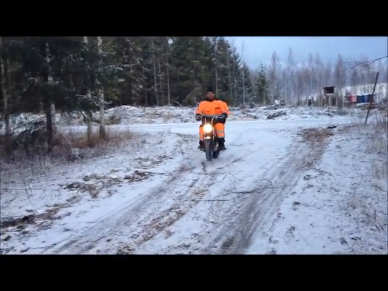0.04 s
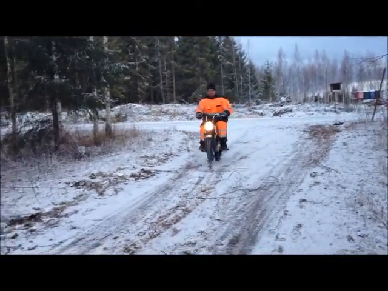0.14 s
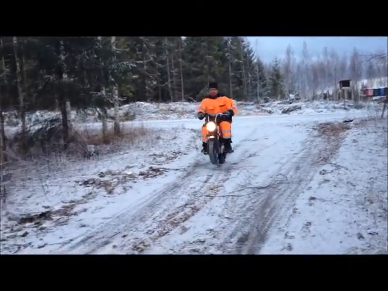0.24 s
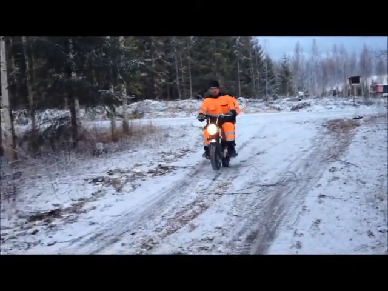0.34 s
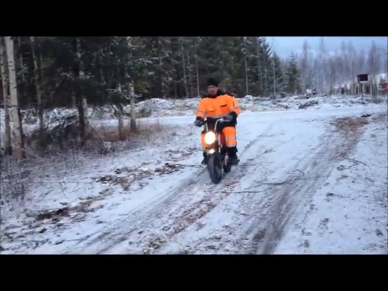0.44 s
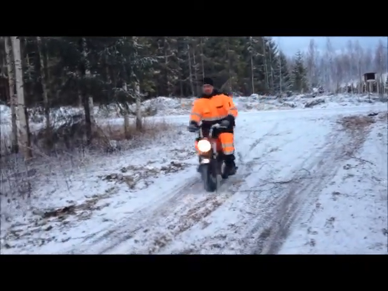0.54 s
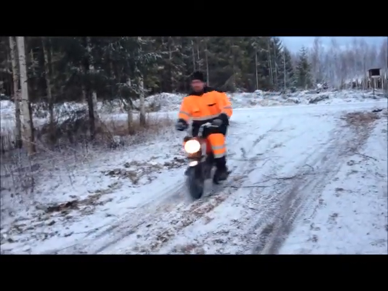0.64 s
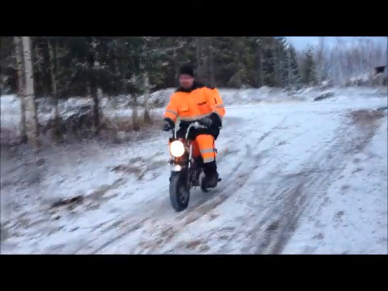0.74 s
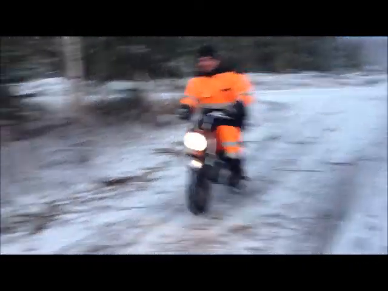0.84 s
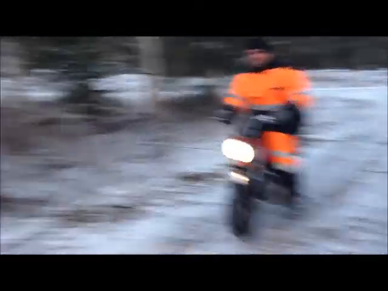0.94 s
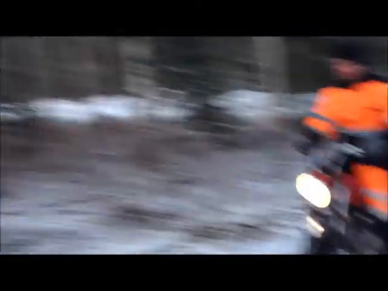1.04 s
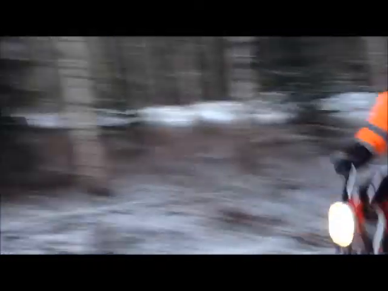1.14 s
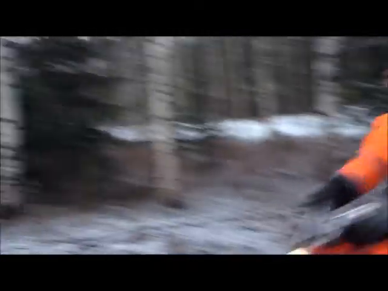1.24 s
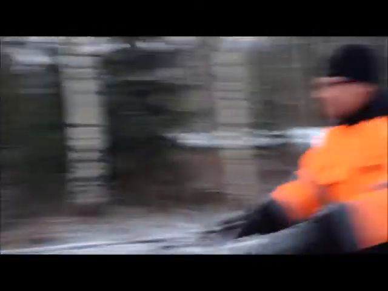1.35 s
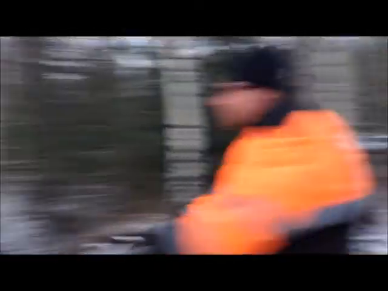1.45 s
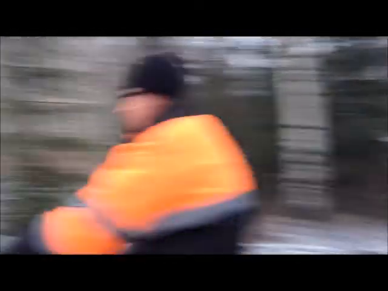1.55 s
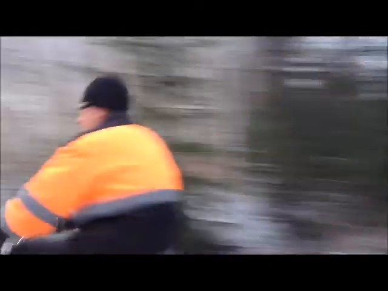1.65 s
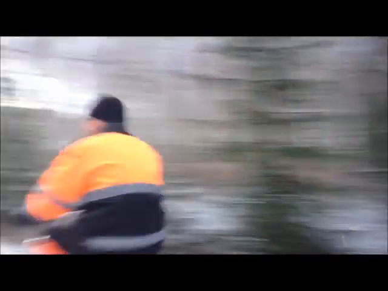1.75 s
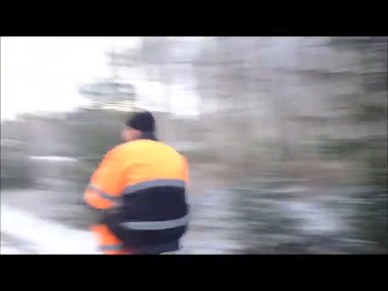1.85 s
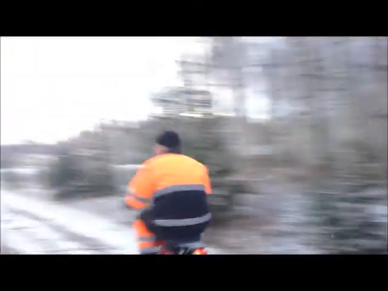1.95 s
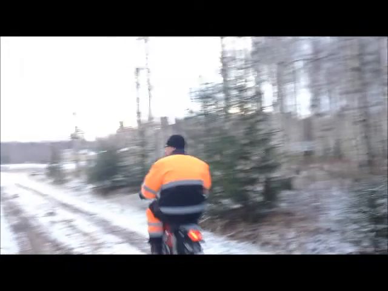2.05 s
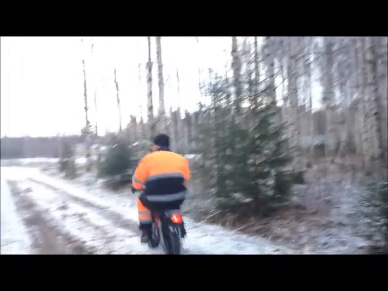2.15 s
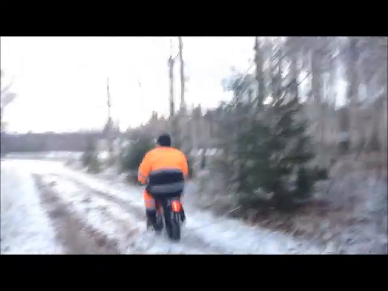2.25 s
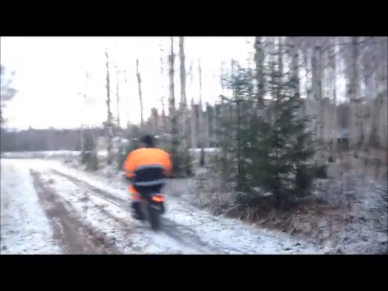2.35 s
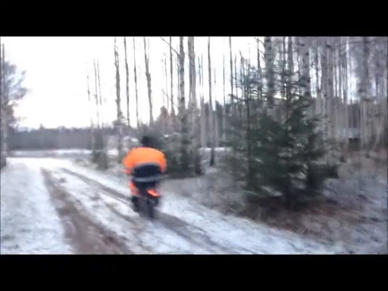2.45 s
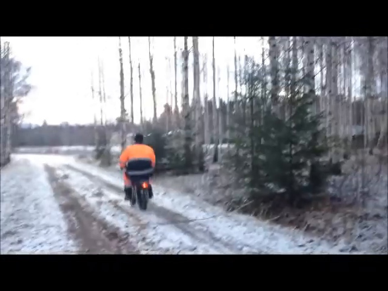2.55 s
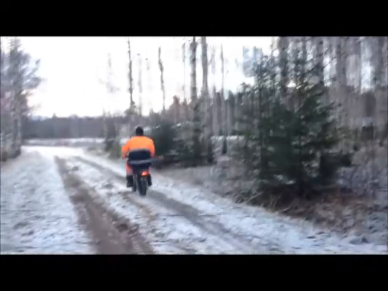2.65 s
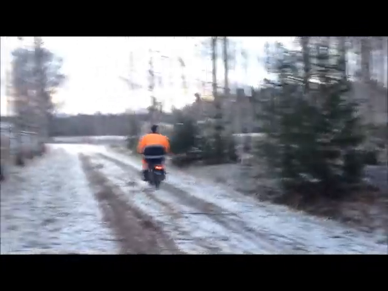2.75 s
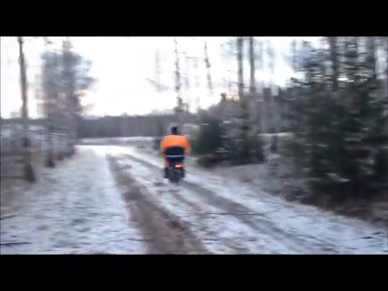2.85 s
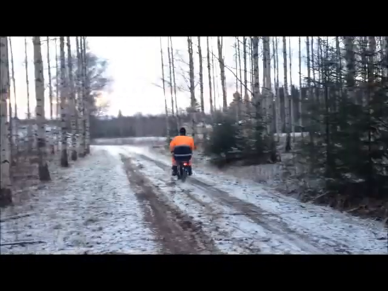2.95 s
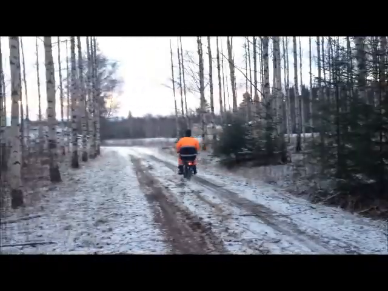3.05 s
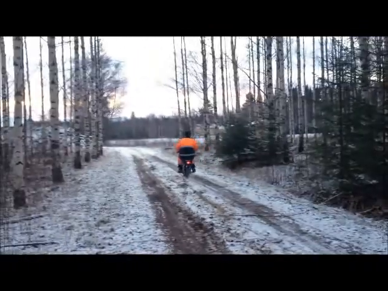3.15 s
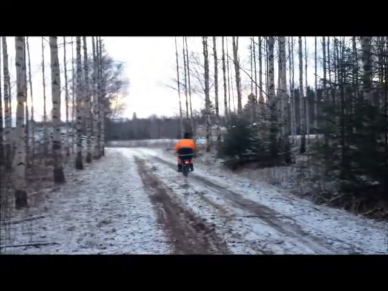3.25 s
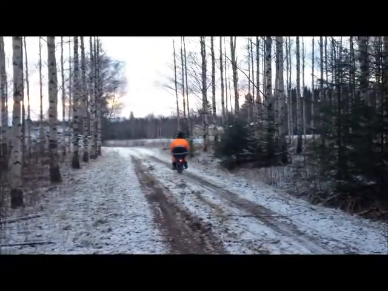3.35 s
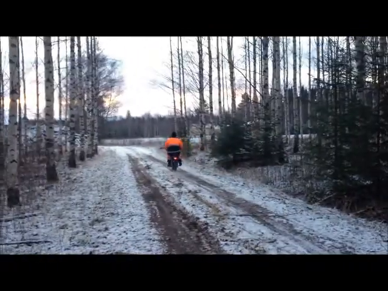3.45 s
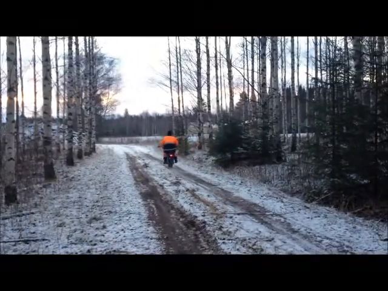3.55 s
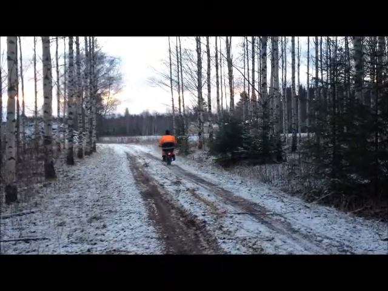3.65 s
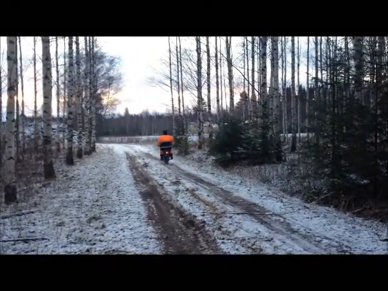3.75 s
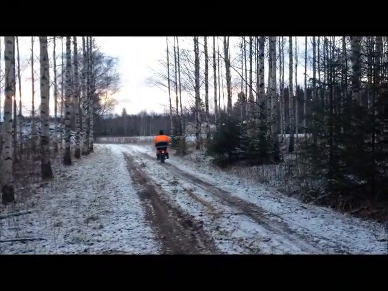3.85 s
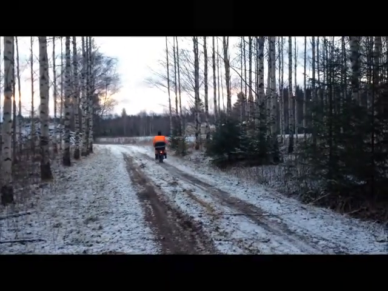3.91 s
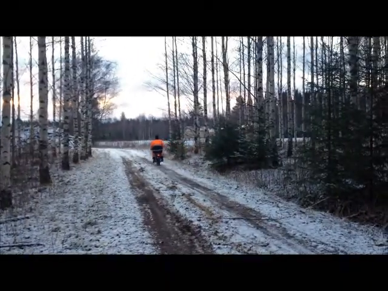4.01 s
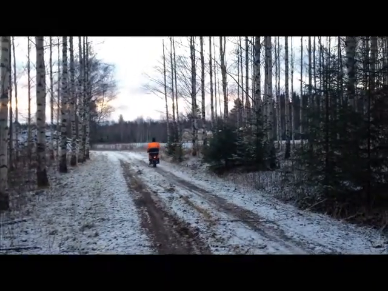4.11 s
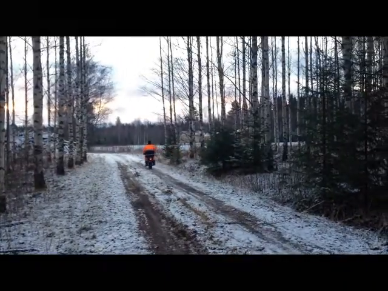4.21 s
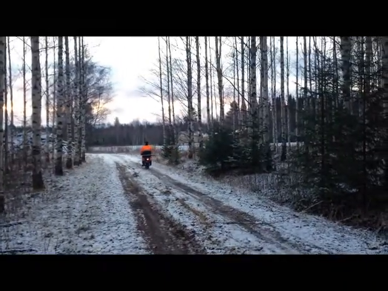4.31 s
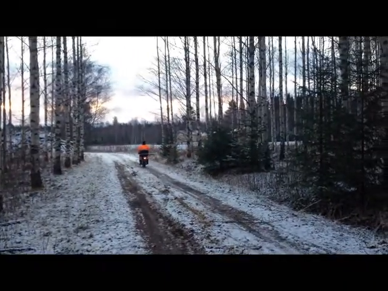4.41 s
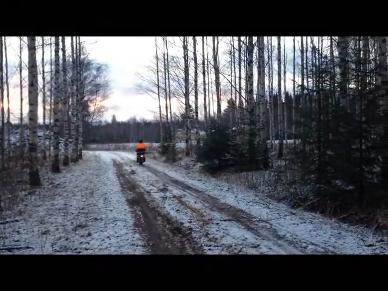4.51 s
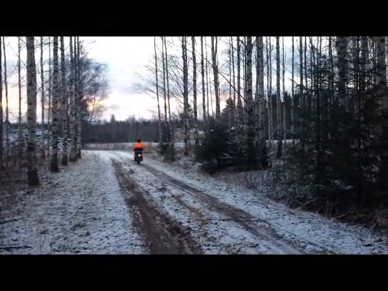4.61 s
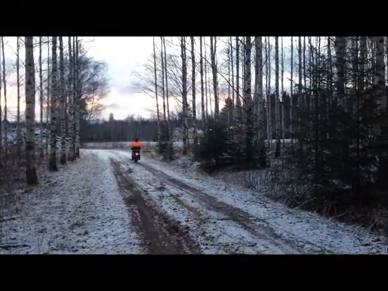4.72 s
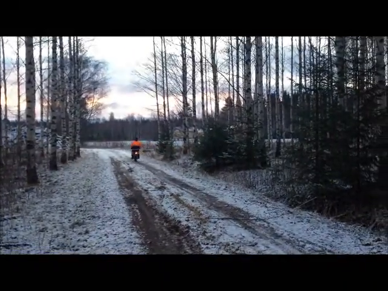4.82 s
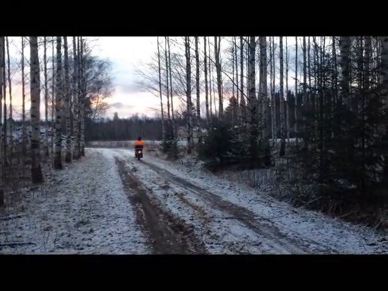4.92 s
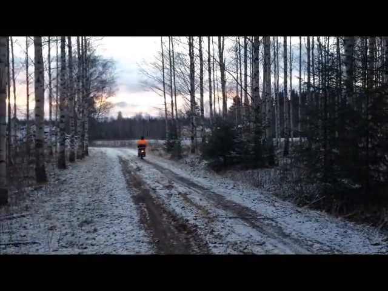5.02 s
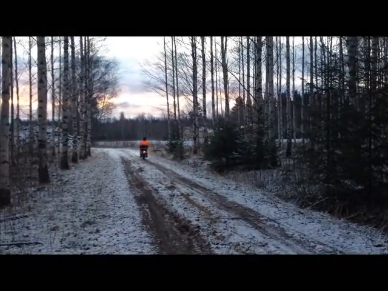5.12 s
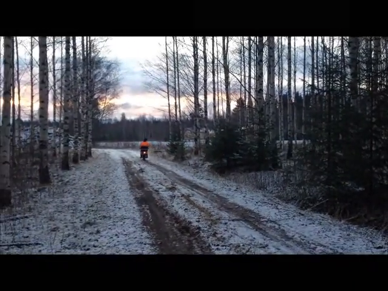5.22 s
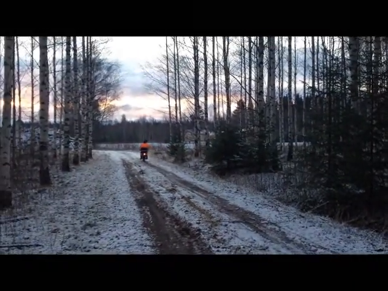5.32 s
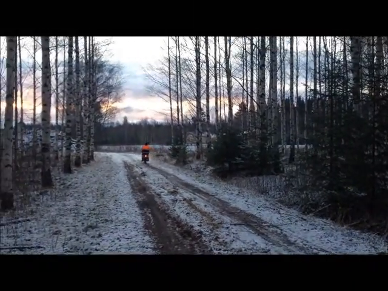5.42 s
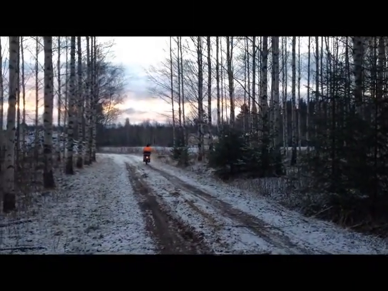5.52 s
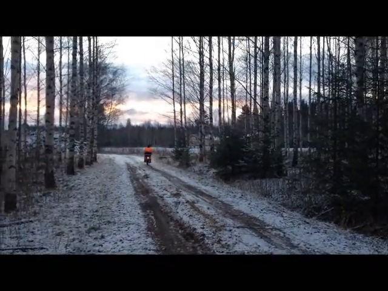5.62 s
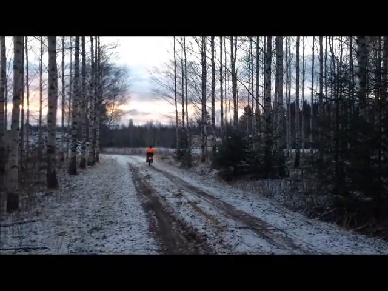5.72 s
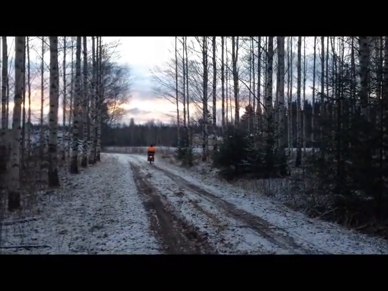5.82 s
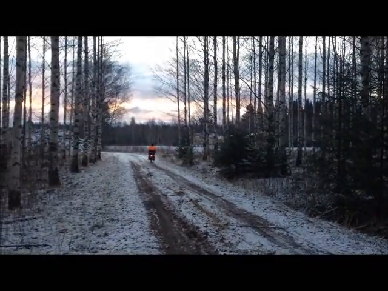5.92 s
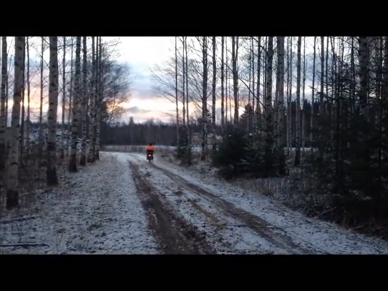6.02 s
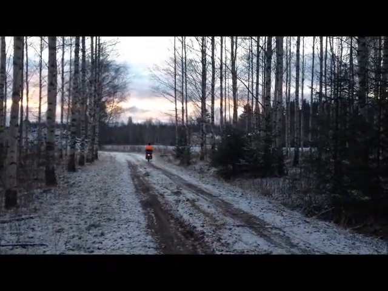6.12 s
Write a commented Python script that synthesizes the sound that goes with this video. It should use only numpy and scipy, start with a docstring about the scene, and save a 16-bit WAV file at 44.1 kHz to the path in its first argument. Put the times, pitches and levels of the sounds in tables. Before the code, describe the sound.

Outdoors among trees, one little motorbike comes towards a thin-sounding handheld microphone. Its tight engine buzz, chain hiss and tyre noise grow abruptly, peaking in a bright close pass. A quick gear change lowers the note, then it climbs slightly while receding. Finally the rider lets off: loose, uneven puttering, a thin descending whine and a small dull pop, almost sinking into quiet.

```python
"""A single-cylinder motorbike comes up a snowy forest track, passes close, shifts up and pulls away,
then shuts the throttle and coasts down with gear whine and one soft backfire.
Under load the firing tones are sums of orders; blasts and pulsed turbulence ring exhaust, shell and fins.
Coloured noise makes the mechanical hiss and, beneath it, the tyre rumble and forest murmur.
The snow returns a delayed share of the sound."""
import sys
import numpy as np
from scipy import signal
from scipy.io import wavfile
from scipy.ndimage import uniform_filter1d

SR = 44100
rng = np.random.default_rng(int(sys.argv[2]) if len(sys.argv) > 2 else 0)


def output_pcm(signal):
    """Save a mono or channel-first signal as 16-bit PCM at the path in sys.argv[1].

    Samples are clipped to [-1, 1] before scaling.
    """
    pcm = np.clip(np.atleast_2d(signal).T, -1, 1) * 32767
    wavfile.write(sys.argv[1], SR, np.round(pcm).astype(np.int16))


N = 272097
T = np.arange(N) / SR  # s
PASS_S, SPEED_M_S, NEAREST_M = 1.597, 7.1, 1.865
ENGINE_M, PIPE_M, EAR_M = 0.387, 0.43, 1.544  # heights above the snow
SHUT_S, SHUT_LENGTH_S = 3.8, 0.045  # throttle fully shut; time it takes to shut


def scene():
    """Bike and backfire as one channel."""
    return (engine() + pops())[None]


def engine():
    """Clean low orders under load; blasts and turbulence ring the shell and fins, and the exhaust when coasting."""
    # Each row: time in s, firing rate in firings per s.
    rev_curve = [(0, 74.6), (.09, 71.3), (.2, 65.8), (.27, 64.9), (.54, 63), (.64, 63.3), (.74, 68.1),
                 (.82, 71.1), (1.16, 72.9), (1.59, 76.2), (1.78, 77.4), (1.9, 80.6), (2.0, 71.2),
                 (2.09, 63.3), (2.16, 59.1), (2.27, 58.8), (2.43, 61.1), (2.64, 62.5), (3.06, 63.9),
                 (3.59, 67.1), (3.73, 67.6), (3.86, 64.1), (4.01, 62.4), (4.35, 61.4), (4.7, 58.4),
                 (5.03, 51.7), (5.3, 48.2), (5.59, 44.8), (6.17, 37.9)]
    # Each row: time in s, levels in dB of silencer shell, cylinder fins and mechanical hiss.
    ride_levels = [(0, -38, -30, -28), (.1, -37, -31.5, -27.5), (.3, -37.5, -28, -29.5),
                   (.69, -41, -24.5, -27), (.91, -33.5, -20, -21.5), (1.06, -33.5, -21, -21.5),
                   (1.29, -25.5, -25, -20), (1.5, -24, -20.5, -20.5), (1.72, -27, -21.5, -20.5),
                   (1.82, -27.5, -25, -20.5), (2.03, -27.5, -29.5, -23), (2.3, -44, -32, -29),
                   (2.52, -40.5, -35.5, -30.5), (3.27, -41, -42, -33.5), (3.74, -33.5, -41.5, -34),
                   (3.82, -51, -53, -38), (4.5, -55.5, -61, -44), (5.79, -83.5, -62, -50),
                   (6.17, -80, -69, -53)]
    # Modes of each part. Each row: frequency in Hz, width in Hz (doubled on the second pass), gain in dB.
    exhaust_modes = [(120, 44, -11), (179, 96, 5), (260, 83, -1), (331, 89, -5.5), (475, 275, -11.5)]
    shell_modes = [(672, 100, 8), (756, 108, 7), (852, 360, -2.5)]
    fin_modes = [(1138, 280, 5.5), (1427, 156, 19.5), (1482, 490, 1.5), (2125, 360, 2.5), (2930, 780, -3.5)]
    # Modes left in the fins without combustion, same columns.
    idle_fin_modes = [(1300, 180, 1), (1480, 180, -3.5)]
    pump_db, pump_fade_db_s, pump_far_db = -31, -9.5, -54  # at shut-off, slope, floor
    flutter_db = -3.5

    rate = uniform_filter1d(curves(rev_curve)[0], size=1200)  # the flywheel smooths the speed
    turns = np.cumsum(rate) / SR  # firing cycles so far
    shell_db, fins_db, hiss_db = curves(ride_levels)
    loaded, rough = throttle(), turbulence_share()
    fired = strength(turns)

    # throttle shut, the piston only pumps air
    pumping = np.hypot(amp(pump_db + pump_fade_db_s * (T - SHUT_S)), amp(pump_far_db))
    # the fins' ring flutters as the bike passes close
    flutter = evened(smoothed_twice(rng.standard_normal(N), 1300))

    pipe = rung(turns, fired, rough, exhaust_modes, part=0)
    shell = rung(turns, fired, rough, shell_modes, part=1)
    fins = rung(turns, fired, rough, fin_modes, part=2)
    idle = rung(turns, fired, rough, idle_fin_modes, part=2)

    pipe = (1 - loaded) * pumping * levelled(pipe)
    shell = amp(shell_db) * levelled(ground(shell))
    fins = levelled(ground(loaded * fins + (1 - loaded) * idle))
    fins = amp(fins_db + flutter_db * closeness() * flutter) * fins
    pull = loaded * fired * tones(turns, rate, rough)
    return pull + pipe + shell + fins + hiss(turns, hiss_db) + whine(turns, fins_db) + rumble(hiss_db)


def tones(turns, rate, rough):
    """Orders 1 to 10 of a blast running to and fro in the pipe and bouncing off snow; each has a little noise."""
    # Level before colour and bounce. Each row: time in s, level in dB.
    pull_levels = [(0.0, -37.5), (0.3, -39), (0.65, -36), (0.85, -31.5), (1.1, -27), (1.3, -24.5),
                   (1.5, -25.5), (1.74, -23.5), (1.82, -27.5), (1.95, -27), (2.1, -34.5), (2.3, -35.5),
                   (3.0, -41.5), (3.74, -42.5)]
    # Colour by bearing. Each row: frequency in Hz, gains in dB from the front, the side and behind.
    pipe_colour = [(120.0, 0.8, -13.5, 2), (163, -3.5, 4, 6), (190.0, 9.5, 1, 7.5), (248, 9.5, 7, 3),
                   (301, 12.5, 2, 4.8), (349, -11.5, -7, -1), (389.4, 13, 19, 7.5), (442.2, 19.5, 18.5, 10),
                   (485, 13, 7.7, 1.2), (550.0, 1.5, -5, -11.5), (670, -15, -39, 8.5), (714, -2, -28, -29),
                   (800.0, -32, -9, -31)]
    # Order 1 against the colour of order 2: dB from the front, the side and behind.
    first_order_db = (-31.5, -25, -26)
    step = 64  # samples between updates of slow controls
    turn_power = 1.32  # how sharply the colour turns with the bearing
    snow_share = 0.89  # of the tones
    trip_s, trip_return = .0046, .8  # round trip in the pipe; share that comes back
    box_hz, box_width_hz = 419, 42  # from the front, the air box rings late
    lead_cycles = 0.3636  # the low tones lead the metal ring

    t, rate, rough = T[::step], rate[::step], rough[::step]
    _, extra_s, bearing = path(PIPE_M, t)
    front = np.clip(bearing, 0, 1) ** turn_power
    rear = np.clip(-bearing, 0, 1) ** turn_power
    hz, *colours = np.transpose(pipe_colour)
    level_db = curves(pull_levels)[0][::step]
    spin, order = np.exp(2j * np.pi * turns), 1
    out = 0
    for k in range(1, 11):
        ahead, beside, behind = (read(np.c_[hz, colour], max(k, 2) * rate) + first_db * (k == 1)
                                 for colour, first_db in zip(colours, first_order_db))
        db = level_db + front * ahead + (1 - front - rear) * beside + rear * behind
        fuzz = 1 + 0.5 * rough * complex_waver(len(t), 8)
        trip_phase = np.exp(-2j * np.pi * k * rate * trip_s)
        echoes = 1 / (1 - (1 - front) * trip_return * trip_phase)
        echo_phase = echoes / abs(echoes)  # the pipe echoes set phase only
        bounce = abs(1 + snow_share * np.exp(-2j * np.pi * k * rate * extra_s))
        late = 2 * front * np.arctan((k * rate - box_hz) / box_width_hz)
        late = late - 2 * np.pi * k * lead_cycles
        gain = np.sqrt(2) * amp(db) * fuzz * np.exp(-1j * late) * bounce * echo_phase
        order = order * spin
        out = out + (np.interp(T, t, gain) * order).real
    return out


def rung(turns, fired, rough, modes, part):
    """Blasts and noise puffs ring one part of the bike, smeared by scatter off nearby trunks."""
    # Factor on the turbulence share for exhaust, shell, fins.
    turbulence_factors = [1.6, 2.3, 1.9]
    # Trunk echo level in dB for exhaust, shell, fins.
    trunk_echo_db = (-9, -6, -9)
    u = np.linspace(0, 1, num=4097)
    harmonics = np.arange(2, 50)[:, None]
    click = np.cos(2 * np.pi * harmonics * u).sum(0)  # one cycle of a band-limited pulse
    # the exhaust valve opens, and the intake valve follows part of a cycle later
    exhaust = np.interp(turns % 1, u, click)
    intake = np.interp((turns - .42) % 1, u, click)
    blasts = evened(exhaust + 0.43 * intake)
    puffs = evened((1.4 + np.exp(-(turns % 1) / .5)) * rng.standard_normal(N))
    share = np.clip(turbulence_factors[part] * rough, 0, .95)
    direct = body(fired * (np.sqrt(1 - share ** 2) * blasts + share * puffs), modes)

    t = np.arange(3000) / SR
    signs = rng.choice([-1., 1.], len(t))
    taps = signs * (rng.random(len(t)) < .03) * amp(-60 * t / 0.15)  # sparse, -60 dB per 0.15 s
    scatter = signal.oaconvolve(direct, taps / np.linalg.norm(taps))[:N]
    return direct + amp(trunk_echo_db[part]) * scatter


def strength(turns):
    """Uneven burning: a gain drawn anew for every firing."""
    draws = rng.standard_normal(int(turns[-1]) + 2)[np.round(turns).astype(int)]
    spread_db = unevenness(even=.4, strained=.7, pumping=2.2, dying=3.0)
    return amp(spread_db * uniform_filter1d(draws, 200))


def turbulence_share():
    """Share of turbulence in the drive, 0-1, ahead of each part's own factor."""
    return unevenness(even=.1, strained=.15, pumping=.48, dying=.45)


def unevenness(even, strained, pumping, dying):
    """From even to strained with closeness under load; from pumping to dying over the coast-down."""
    slowed = np.clip((T - SHUT_S) / (T[-1] - SHUT_S), 0, 1)
    pulling = even + (strained - even) * closeness()
    return throttle() * pulling + (1 - throttle()) * (pumping + (dying - pumping) * slowed)


def throttle():
    """1 while the engine pulls, 0 once it coasts."""
    return np.clip((SHUT_S - T) / SHUT_LENGTH_S, 0, 1)


def path(height_m, t):
    """Distance along the snow in m, extra delay of its bounce in s, bearing (towards 1 ahead, -1 behind)."""
    along = SPEED_M_S * (PASS_S - t)
    flat = np.hypot(NEAREST_M, along)
    extra_m = np.hypot(flat, EAR_M + height_m) - np.hypot(flat, EAR_M - height_m)
    return flat, extra_m / 343, along / np.hypot(flat, EAR_M)


def closeness():
    """1 as the bike passes, falling towards 0 far off."""
    return 1 - abs(path(ENGINE_M, T)[2])


def ground(x):
    """The snow path is longer the nearer the bike: a comb that sweeps down and back up."""
    flat, extra_s, _ = path(ENGINE_M, T)
    soft = resonate(x, 0, 5000) / 2  # snow swallows treble
    share = 0.22 * np.clip(18.0 / flat, 0, 1)  # far off, scatter from the trees fills the comb
    return x + share * np.interp(T - extra_s, T, soft)


def hiss(turns, db):
    """Valve gear, chain and tyres: patchy noise beating once and twice a cycle; its colour turns with the bike."""
    # Noise colour ahead, near and far. Each row: frequency in Hz, spectral level in dB.
    ahead_colour = [(1000, -11), (1700, 0), (2120, -8.5), (2410, -5.5), (3440, 0), (4700, -12),
                    (5550, -13.5), (6910, -9), (11100, -22), (13300, -28), (15200, -26)]
    near_colour = [(1000, -14.5), (1700, 4), (2010, -16), (2260, -5), (2640, -13), (3260, -4.5),
                   (3990, -1.5), (4750, -16), (6420, -5), (8150, -10), (9710, -20.5), (12200, -18),
                   (15200, -24.5)]
    far_colour = [(1000, -8.5), (1700, -9.5), (2410, -6), (2970, -11), (3260, 0.5), (3540, -5), (3950, 2.5),
                  (4250, -5), (4750, -21.5), (5970, -6.5), (6790, -13.5), (10800, -21), (15200, -39)]
    patch_db, flicker_db = 3.2, 1.0
    band_db = 2.2  # broad bands above 4 kHz that swell and fade over a second or so

    def shape_db(hz, s):
        ahead = np.clip((1.2 - s) / 0.25, 0, 1)
        far = np.clip((s - 2.) / 1.83, 0, 1)
        patches = rng.standard_normal((len(s), len(hz))).T
        patches = uniform_filter1d(patches, 2, axis=0)
        patches = evened(uniform_filter1d(patches, 90, axis=1))
        bands = rng.standard_normal((len(s), len(hz))).T
        bands = uniform_filter1d(uniform_filter1d(bands, 6, axis=0), 4, axis=0)
        bands = evened(uniform_filter1d(bands, 350, axis=1))
        flicker = evened(uniform_filter1d(rng.standard_normal(len(s)), 12))
        colour = ahead * read(ahead_colour, hz) + far * read(far_colour, hz)
        colour = colour + (1 - ahead - far) * read(near_colour, hz)
        treble = np.clip(hz / 8000, 0, 1)
        return colour + band_db * bands * (hz > 4000) + patch_db * patches + flicker_db * flicker * treble

    once = 0.072 * np.cos(2 * np.pi * (turns - .15))
    twice = 0.09 * np.cos(4 * np.pi * (turns - .3))
    return amp(db) * levelled(ground((1 + once + twice) * noise(shape_db, 512)), 0.72)


def whine(turns, fins_db):
    """Gear mesh: a wavering tone locked to the firing rate, faint under load, rising on the overrun."""
    mesh_order = 28.3  # on the firing rate
    full_db = 2.5  # against the fins, at full coasting
    coasting = np.clip((T - 4.) / 1.3, .1, 1)
    waver = 1 + .3 * complex_waver(N, 500)
    return amp(fins_db + full_db) * coasting * (waver * np.exp(2j * np.pi * mesh_order * turns)).real


def pops():
    """A soft backfire: a click rings the silencer briefly."""
    # Each row: time in s, peak level in dB.
    backfires = [(4.472, -34)]
    clicks = np.zeros(N)
    for s, db in backfires:
        clicks[round(s * SR)] = amp(db)
    ring = body(clicks, [(620, 90, 0), (1100, 110, 0), (1550, 200, -12)])  # Hz, width Hz, dB
    return ring / abs(ring).max() * clicks.max()


def rumble(hiss_db):
    """Low tyre and air noise that follows the bike, over the steady murmur of the forest air."""
    # Each row: frequency in Hz, spectral level in dB.
    rumble_colour = [(20, -20), (60, -16), (110, -8), (250, 0), (600, -5), (1200, -12), (2500, -40)]
    against_hiss_db, still_db = -11, -54.5
    level = np.hypot(amp(hiss_db + against_hiss_db), amp(still_db))
    return level * evened(noise(lambda hz, s: read(rumble_colour, hz) + 0 * s, 2048))


def body(drive, modes):
    """Sum of modes with alternating sign; each is applied twice to keep the valleys dark."""
    out = 0
    for k, (hz, width, db) in enumerate(modes):
        ring = resonate(resonate(drive, hz, width), hz, 2 * width)
        out = out + (-1) ** k * amp(db) * ring
    return out


def resonate(x, hz, width_hz):
    """One ringing pole of about unit gain at its frequency."""
    r = np.exp(-np.pi * width_hz / SR)
    return 2 * signal.lfilter([1 - r], [1, -r * np.exp(2j * np.pi * hz / SR)], x).real


def noise(shape_db, size):
    """Noise from random short-time spectra; shape_db(hz, s) gives the magnitude in dB."""
    frames = 4 * N // size + 5
    hz = np.fft.rfftfreq(size, 1 / SR)[:, None]
    s = np.arange(frames) * size / 4 / SR
    a, b = rng.standard_normal((frames, size // 2 + 1, 2)).T
    spectra = (a + 1j * b) * amp(shape_db(hz, s))
    return signal.istft(spectra, nperseg=size, noverlap=3 * size // 4)[1][:N]


def complex_waver(count, size):
    """Slow complex noise; real and imaginary parts of RMS 1."""
    a, b = smoothed_twice(rng.standard_normal((2, count)), size)
    return evened(a) + 1j * evened(b)


def smoothed_twice(x, size):
    """Two running means of size samples."""
    return uniform_filter1d(uniform_filter1d(x, size=size), size=size)


def levelled(x, span_s=0.045):
    """Holds the slow RMS level at 1."""
    return x / np.sqrt(abs(smoothed_twice(x ** 2, int(span_s * SR))) + 1e-20)


def evened(x):
    """Scales to RMS 1."""
    return x / np.sqrt(np.mean(x ** 2) + 1e-20)


def amp(db):
    """Decibels to amplitude factor."""
    return 10 ** (np.asarray(db) / 20)


def read(points, hz):
    """Interpolates (Hz, value) points over log frequency."""
    f, value = np.transpose(points)
    return np.interp(np.log(hz + 1), np.log(f + 1), value)


def curves(rows):
    """Interpolates each column over time; the first column is in seconds."""
    s, *columns = np.transpose(rows)
    return [np.interp(T, s, c) for c in columns]


def record(dry):
    """The bass is cut, the housing notches 4.75 kHz, peaks round off towards 0.97; then the band limit."""
    edge_hz = 15330
    thin = signal.sosfilt(signal.butter(3, 75, "high", fs=SR, output="sos"), dry)
    notched = thin - 0.75 * resonate(thin, 4750, 600)
    rounded = notched / (1 + (abs(notched) / .97) ** 6) ** (1 / 6)
    lowpass = signal.firwin(511, edge_hz, window=("kaiser", 9), fs=SR)
    return signal.oaconvolve(rounded, lowpass[None], "same")


dry = scene()
out = record(dry)
output_pcm(out)
```